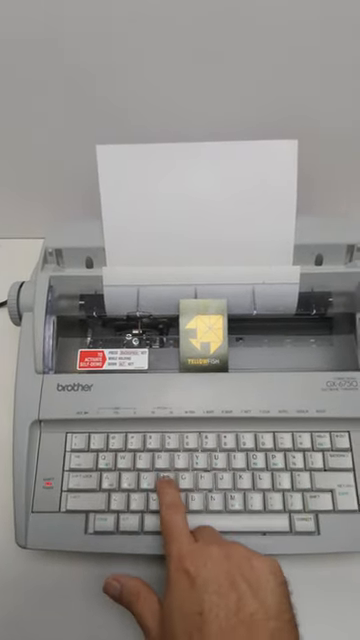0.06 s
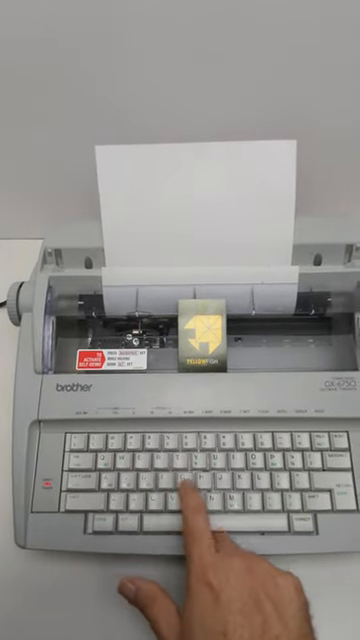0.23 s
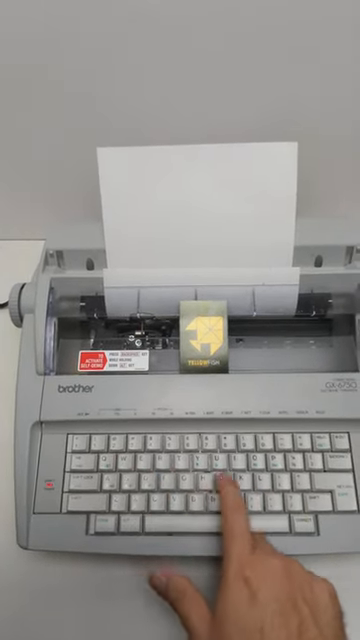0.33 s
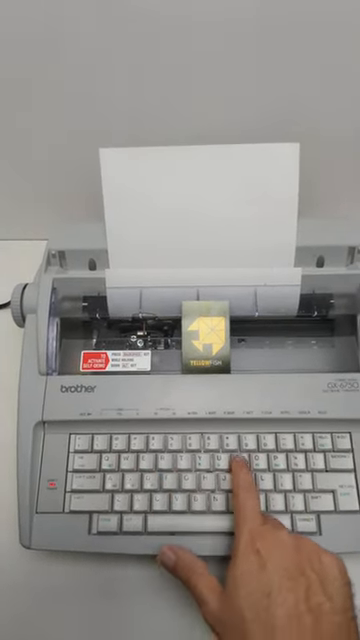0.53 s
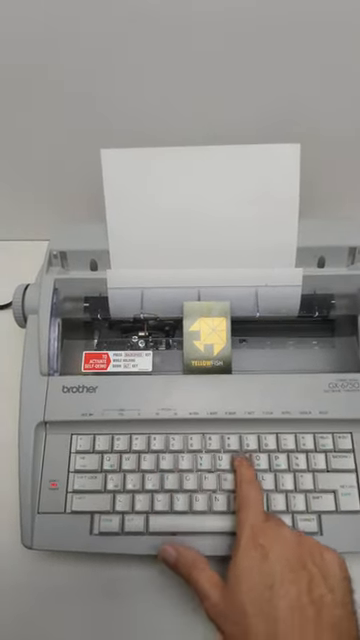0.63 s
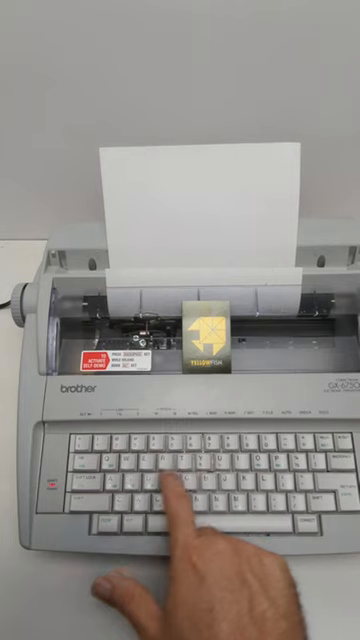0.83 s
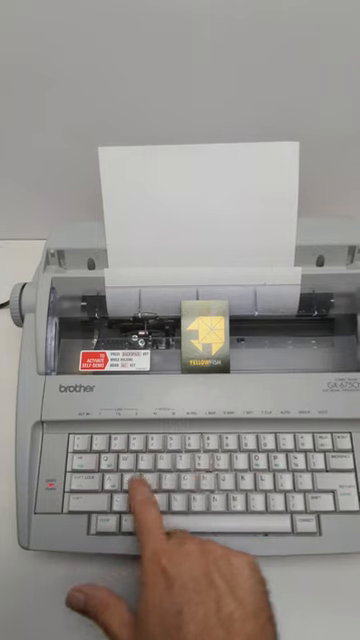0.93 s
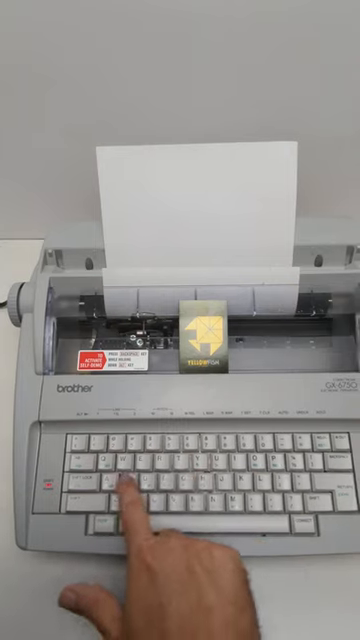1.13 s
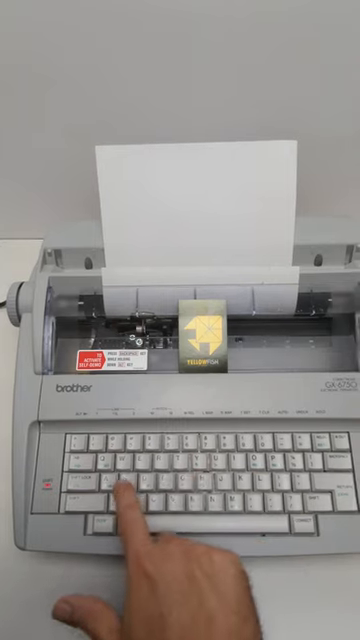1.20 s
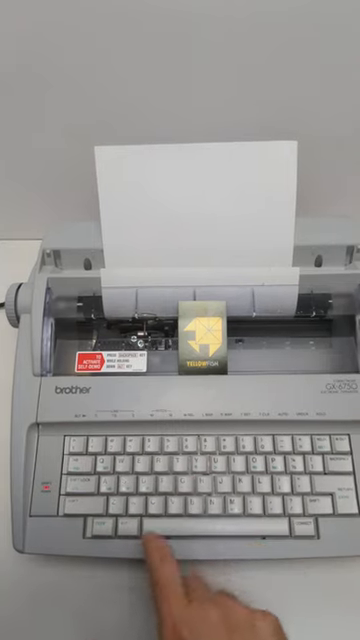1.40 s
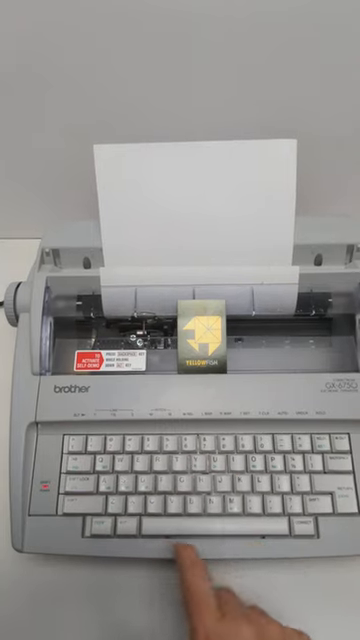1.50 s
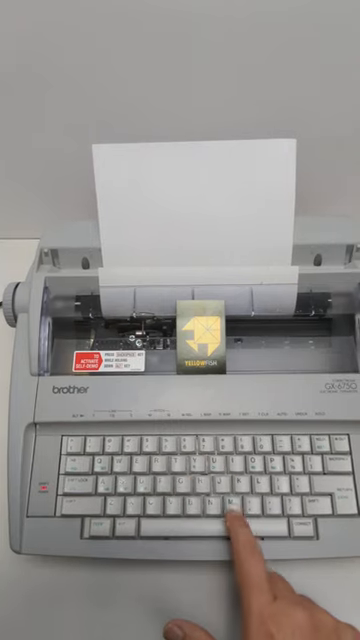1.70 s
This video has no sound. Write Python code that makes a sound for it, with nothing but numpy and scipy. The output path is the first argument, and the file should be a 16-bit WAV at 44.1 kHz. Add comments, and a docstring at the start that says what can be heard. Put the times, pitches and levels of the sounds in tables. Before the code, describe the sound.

An electronic typewriter prints three single letters: light key clicks, a brief motor whirr, a quick rattle and a hard sharp clack with a duller knock after, close to a phone in a small hard room.

```python
"""Electronic typewriter printing three letters

A machine on a desk in a small hard room, close to a phone: keys click, the print wheel whirrs round, the hammer
is launched with a rattle, strikes and knocks back, and the carriage settles with a short low note.
Contacts are random impulses through fixed spectra; the case and frame are decaying sines, the desk brief thumps.
Diffuse noise tails make the room's reverberation, over a low hum."""
import sys
import numpy as np
from scipy import signal
from scipy.fft import rfft, irfft, next_fast_len
from scipy.io import wavfile
from scipy.ndimage import uniform_filter1d

SR = 44100
rng = np.random.default_rng(int(sys.argv[2]) if len(sys.argv) > 2 else 0)


def elevation(decibels):
    """Turn decibel levels (scalar or array-like) into linear amplitude ratios."""
    levels = np.asarray(decibels, float)
    return 10 ** (levels / 20)


def wrap_up_sound(samples):
    """Save the sound to the file named by the first command line argument, as 16-bit audio."""
    columns = np.atleast_2d(samples).T
    # keep every value between -1 and 1, then stretch to whole-number steps
    tamed = np.clip(columns, -1, 1)
    steps = np.round(tamed * 32767).astype(np.int16)
    wavfile.write(sys.argv[1], SR, steps)


N = 77175

# Print cycles. Each row: launch and strike in seconds, strength in dB, level of the lowest frame tone in dB.
PRINTS = [(0.2348, 0.2689, -2.5, -42), (0.7774, 0.8114, -2.5, -40.5), (1.2388, 1.2722, -2.5, -42)]
# Key and latch clicks. Each row: start in seconds, level in dB, brightness in dB per octave,
# decay t60 in seconds, level of the case ring in dB.
CLICKS = [(0.061, -39.5, -2.5, 0.093, -77), (0.08, -29.5, 7.5, 0.064, -44.5),
          (0.191, -37.5, -1, 0.098, -41.5), (0.593, -44.5, -6.5, 0.046, -55),
          (0.605, -44, 4.5, 0.055, -46.5), (0.616, -50.5, -7, 0.06, -54.5), (0.636, -32.5, 5, 0.053, -43.5),
          (0.723, -36.5, 0, 0.084, -38), (0.729, -58.5, 2, 0.041, -47), (1.105, -47, 1, 0.068, -51.5),
          (1.112, -47, -3, 0.05, -60), (1.12, -55.5, -8.5, 0.034, -38)]
# The strike and its bounces. Each row: seconds after the strike, level in dB, decay t60 in seconds.
BLOWS = [(0., -2, 0.0048), (.0025, -6.5, 0.027), (.0105, -13.5, 0.067), (0.021, -27, 0.038)]
# The dull knock of the hammer's return. Each row: seconds after the strike, level in dB, decay t60 in seconds.
KNOCKS = [(0.063, -20, 0.082)]


def evened(x):
    """Normalises a signal to unit root-mean-square value."""
    return x / np.sqrt(np.mean(x ** 2) + 1e-20)


def read(points, hz):
    """Interpolates a spectrum on a logarithmic frequency axis, as pitch is heard."""
    f, value = np.transpose(points)
    return np.interp(np.log(hz + 1), np.log(f + 1), value)


def add(mix, s, sound):
    """Superposes a sound on the mix from time s in seconds, by linear addition."""
    part = mix[round(s * SR):][:len(sound)]
    part += sound[:len(part)]


def colour(points, tilt_db=0., size=2048):
    """Minimum-phase filter of unit energy: the Hilbert transform of the log spectrum gives its phase."""
    hz = abs(np.fft.fftfreq(size, 1 / SR))
    tilt = tilt_db * np.log2((hz + 100) / 2000)
    log = np.log(elevation(np.maximum(read(points, hz) + tilt, -100)))
    taps = np.fft.ifft(np.exp(np.conj(signal.hilbert(log)))).real[:size // 2]
    return taps / np.linalg.norm(taps)


def modes(table, size=12000, sag=0.):
    """Modal superposition: exponentially dying sines that start sharp by the share sag and settle."""
    t = np.arange(size) / SR
    settle_s = .011
    bent = t + sag * settle_s * (1 - np.exp(-t / settle_s))
    return sum(elevation(db - 60 * t / t60) * np.sin(2 * np.pi * hz * bent) for hz, db, t60 in table)


def grit(size, spread_db):
    """Dense tiny contacts: Gaussian noise of uneven, exponentially distributed size in dB."""
    unevenness = np.minimum(rng.exponential(1, size), 5)
    return evened(rng.standard_normal(size) * elevation(spread_db * unevenness))


def burst(drive, db, t60, rise_s):
    """Impact envelope: a linear rise times an exponential decay."""
    t = np.arange(len(drive)) / SR
    return drive * np.minimum(t / rise_s, 1) * elevation(db - 60 * t / t60)


def tone(hz):
    """One second of a pure tone, simple harmonic motion of unit amplitude."""
    return np.sin(2 * np.pi * hz * np.arange(SR) / SR)


def noise_pair(frames, size):
    """Partial coherence: random short-time spectra for two microphones, alike in the bass."""
    # Each row: frequency in Hz, left-right likeness from 0 to 1.
    likeness = [(200, 0.97), (450, 0.87), (900, 0)]
    hz = np.fft.rfftfreq(size, 1 / SR)
    a, b, c, d = rng.standard_normal((frames, len(hz), 4)).T
    same = read(likeness, hz)[:, None]
    left = a + 1j * b
    right = same * left + np.sqrt(1 - same ** 2) * (c + 1j * d)
    return hz, np.array([left, right])


def hum():
    """Stationary coloured noise, the low rumble of room and desk, swelling while the machine works."""
    # Each row: frequency in Hz, relative level in dB.
    spectrum = [(25, -43), (60, 2.5), (90, -2), (130, -3.5), (200, -24.5), (300, -5.5), (380, -31.5),
                (2000, -32), (14000, -60.5)]
    # Each row: time in seconds, change of level in dB.
    swell = [(.05, -5), (0.102, 2), (1.621, 0), (1.721, -2.5)]
    hz, z = noise_pair(N // 512 + 5, size=2048)
    rumble = signal.istft(z * elevation(read(spectrum, hz))[:, None], nperseg=2048, noverlap=1536)[1][:, :N]
    swell_db = np.interp(np.arange(N) / SR, *np.transpose(swell))
    return elevation(-58 + swell_db) * evened(rumble)


def whirr():
    """Source and filter: the turning print wheel motor as dense contacts of varying level."""
    # Each row: time in seconds, level in dB.
    course = [(0.056, -74), (0.076, -50.5), (0.151, -52.5), (.2, -48.5), (0.234, -46.5), (.3, -92),
              (.585, -84.5), (.61, -53.5), (.7, -50), (0.773, -46), (.84, -82), (1.101, -64),
              (1.129, -57.5), (1.2, -50.5), (1.236, -46), (1.3, -70.5)]
    # Each row: frequency in Hz, relative level in dB.
    spectrum = [(150, -15.5), (297, -1.5), (406, -2.5), (1140, -3), (1660, -4.5), (4160, -10), (7620, -28),
                (13200, -29.5), (16000, -55)]
    level_db = np.interp(np.arange(N) / SR, *np.transpose(course))
    return signal.oaconvolve(elevation(level_db) * grit(N, 1.5), colour(spectrum))[:N]


def click(db, tilt_db, t60):
    """Brief contact noise of a key or latch through a fixed spectrum, tilted by its brightness."""
    # Each row: frequency in Hz, relative level in dB.
    spectrum = [(150, -29), (457, -6.5), (1290, 5.5), (1790, 9.5), (2220, 0.5), (3900, 5.5), (4350, 6),
                (4850, -1.5), (7180, -11), (9260, -12), (16000, -40)]
    contact = burst(grit(SR // 2, 0.67), db, t60, rise_s=0.0016)
    return signal.oaconvolve(contact, colour(spectrum, tilt_db))


def case(db, tilt_db=0.):
    """Modal excitation: a soft-edged blow rings the plastic case, landing a little differently each time."""
    # Each row: frequency in Hz, level in dB before the blow's own level, tilt and scatter, decay t60 in seconds.
    case_modes = [(336.1, -12.5, 0.34), (427.1, -0.5, 0.17), (621.7, -10, 0.16), (738, -24.5, 0.3),
                  (893.7, -10.5, 0.19), (920, -16, 0.27)]
    pivot_hz = case_modes[1][0]
    struck = []
    for hz, level_db, t60 in case_modes:
        scatter_db = 2 * rng.standard_normal()
        struck.append((hz, db + level_db + scatter_db + tilt_db * np.log2(hz / pivot_hz), t60))
    ring = modes(struck, sag=.13)
    return ring * np.minimum(np.arange(len(ring)) / SR / .004, 1)


def rattle(drive):
    """Resonance under repeated impacts: loose metal chatters in uneven clumps while the hammer flies."""
    # Each row: frequency in Hz, damping in Hz (t60 is 0.24 over it), level in dB before differentiation.
    peaks = [(4550, 250, 0)]
    # Each row: frequency in Hz, relative level in dB.
    spectrum = [(150, -33.5), (414, -1), (790, -7.5), (2220, 3), (2500, -7), (4490, 2.5), (7470, -9),
                (11900, -4), (16000, -34)]
    full_s, fade_s, level_db, sag_db = .03, .003, -26, -12.5
    t = np.arange(len(drive)) / SR
    gate = np.clip(t / 0.00052, 0, 1) * np.clip((full_s - t) / fade_s + 1, 0, 1)
    gate *= elevation(level_db + sag_db * t / full_s)
    clumps = evened(uniform_filter1d(rng.standard_normal(len(t)), round(.0012 * SR)))
    gate *= elevation(4 * clumps)  # 4 dB rms of unevenness
    metal = np.gradient(modes([(hz, db, 0.24 / damping) for hz, damping, db in peaks], size=1024))
    return signal.oaconvolve(gate * drive, colour(spectrum) + metal / np.linalg.norm(metal))


def strike_blows(drive):
    """Impact excitation of resonators: the strike and its bounces ring hammer and wheel."""
    # Each row: frequency in Hz, relative level in dB.
    spectrum = [(150, -11.5), (400, -8), (800, -8), (1300, -2), (1700, 0.5), (2500, -3.5), (4000, 2.5),
                (6000, -8), (9300, -14.5), (16000, -31.5)]
    # Each row: frequency in Hz, relative level in dB before differentiation, decay t60 in seconds.
    hammer_modes = [(2450, -5, .012), (2780, -2, .014), (4200, 0, .012), (4800, -1, .012)]
    blows = np.zeros(drive.shape[1])
    for row, (s, db, t60) in zip(drive[1:], BLOWS):
        add(blows, s, burst(row, db, t60, rise_s=0.00017))
    hammer = np.gradient(modes(hammer_modes, size=1024))
    return signal.oaconvolve(blows, colour(spectrum) + .5 * hammer / np.linalg.norm(hammer))


def jingle(drive):
    """High-passed contact noise with exponential decay: a bright jingle just after the strike."""
    # Each row: frequency in Hz, relative level in dB.
    spectrum = [(6000, -34), (8500, 13), (10200, 14.5), (13000, 0.5), (16000, -15)]
    contact = np.zeros(len(drive))
    add(contact, .01, burst(drive, db=-17, t60=0.061, rise_s=0.0026))
    return signal.oaconvolve(contact, colour(spectrum))


def return_knocks(drive):
    """Soft impact: the slow rise and low spectrum make the hammer's return dull."""
    # Each row: frequency in Hz, relative level in dB.
    spectrum = [(150, -9.5), (400, -5), (900, -2), (1600, -10.5), (2600, -8.5), (8000, -47.5)]
    knocks = np.zeros(drive.shape[1])
    for row, (s, db, t60) in zip(drive[::-1], KNOCKS):
        add(knocks, s, burst(row, db, t60, rise_s=0.007))
    return signal.oaconvolve(knocks, colour(spectrum))


def desk_thumps(out, strike):
    """Low resonance of a heavy body: the desk answers with short deep tones."""
    # Each row: seconds after the strike, level in dB, frequency in Hz.
    thumps = [(.014, -31, 70.2), (0.062, -29.5, 55.8), (0.104, -38.5, 58)]
    for s, db, hz in thumps:
        add(out, strike + s, burst(tone(hz), db, t60=0.13, rise_s=0.016))


def frame_ring(ring_db):
    """Weakly damped harmonics with amplitude modulation: a part of the frame sings on, wavering."""
    # Upper tones. Each row: multiple of the lowest tone's frequency, level in dB.
    upper = [(3, -61.), (4, -51.)]
    t, out = np.arange(SR) / SR, np.zeros(SR)
    for times, db in [(1, ring_db)] + upper:
        waver_hz = rng.uniform(16.59, 69.3)
        waver = 1 + .4 / times * np.sin(2 * np.pi * (waver_hz * t + rng.random()))
        out += burst(waver * tone(round(times) * 414.5), db, t60=1.3, rise_s=0.014)
    return out


def carriage_step():
    """Damped oscillation: the carriage settles with a short low note."""
    return burst(tone(286), db=-53.5, t60=0.6, rise_s=0.02)


def motor_whine(out):
    """Frequency sweep by phase integration: a faint whine as the wheel motor speeds up."""
    # In order: start and end in seconds, first and last frequency in Hz, level in dB.
    start, end, from_hz, to_hz, db = (1.14, 1.235, 950, 1450, -57)
    hz = np.linspace(from_hz, to_hz, round((end - start) * SR))
    swell = np.hanning(len(hz)) ** .5
    add(out, start, elevation(db) * swell * np.sin(2 * np.pi * np.cumsum(hz) / SR))


def contacts():
    """Superposed impact noise: wheel motor, key clicks, rattles and strikes that partly repeat."""
    share = 0.76  # amplitude weight of the contacts common to all cycles
    rows = (1 + len(BLOWS) + len(KNOCKS), SR // 2)
    out = whirr()
    for s, db, tilt_db, t60, _ in CLICKS:
        add(out, s, click(db, tilt_db, t60))
    same = grit(rows, 2.3)
    for launch, strike, db, _ in PRINTS:
        drive = elevation(db) * (share * same + np.sqrt(1 - share ** 2) * grit(rows, 3.3))
        add(out, launch, rattle(drive[0]))
        add(out, strike, strike_blows(drive) + return_knocks(drive) + jingle(drive[0]))
    return out


def rings():
    """Free vibration of case, desk, carriage and motor, with the frame's long ring kept apart."""
    # Launch, strike and return. Each row: seconds after the strike, level in dB, brightness in dB per octave.
    case_hits = [(-.034, -42.5, -11), (0., -18, 4), (.066, -34, 9.5)]
    body, frame = np.zeros((2, N))
    for s, *_, case_db in CLICKS:
        add(body, s, case(case_db, tilt_db=-4.5))
    for _, strike, db, ring_db in PRINTS:
        for s, case_db, tilt_db in case_hits:
            add(body, strike + s, case(db + case_db, tilt_db))
        desk_thumps(body, strike)
        add(body, strike + 0.093, carriage_step())
        add(frame, strike + .006, frame_ring(ring_db))
    motor_whine(body)
    return body, frame


def tail(t60_of, gap_s):
    """Diffuse-field decay: two-channel noise, left energy 1, each band dying at its own speed."""
    hz, z = noise_pair(SR // 64, size=256)
    t = np.arange(z.shape[2]) * 64 / SR
    taps = signal.istft(z * elevation(-60 * t / t60_of(hz)[:, None]), nperseg=256, noverlap=192)[1]
    taps *= np.clip(np.arange(taps.shape[1]) / SR / gap_s, 0, 1)  # fades in over the gap
    return taps / np.linalg.norm(taps[0])


def room(pair):
    """Convolution with an impulse response: quick scatter from near surfaces, then reverberation."""
    # Each row: frequency in Hz, reverberation t60 in seconds.
    reverberation = [(200, 0.62), (530, 0.56), (1400, 0.46), (3700, 0.42), (12000, 0.32)]
    near = elevation(-10) * tail(lambda hz: 0.02 + 0 * hz, gap_s=0.00036)
    far = elevation(-7.5) * tail(lambda hz: read(reverberation, hz), gap_s=0.00087)
    return signal.fftconvolve(pair, near + far, axes=1)[:, :N]


def scene():
    """Two-point reception: the ports face other parts of the machine, with unlike phase and treble."""
    # Each row: frequency in Hz, likeness of the two ports from 0 to 1.
    port_likeness = [(350, 0.95), (700, 0.22), (3000, 0.29), (14000, 0.31)]
    # Each row: frequency in Hz, phase in radians by which the left leads.
    phase_lead = [(0, 0), (520, -.1), (1980, 3.8), (2500, .8), (3880, 4.3), (5250, -1.9), (6200, .3),
                  (7240, -2.1), (9910, -6.), (11600, -12.4), (16500, -14.6)]
    # Each row: frequency in Hz, left minus right level in dB.
    level_difference = [(60, -1), (200, 2), (380, -2), (700, -5), (1290, 3.5), (2380, 0), (4400, 3),
                        (8120, -2.5), (15000, 26)]
    size = next_fast_len(N + 4096)
    hz = np.fft.rfftfreq(size, 1 / SR)
    same = read(port_likeness, hz)
    front, back = rfft(contacts(), size), rfft(contacts(), size)
    pair = np.array([front, same * front + np.sqrt(1 - same ** 2) * back])
    body, frame = rings()
    lead = np.interp(hz, *np.transpose(phase_lead))
    direct = (pair + rfft(body, size)) * np.array([np.exp(.5j * lead), np.exp(-.5j * lead)])
    reverberant = rfft(room(irfft(pair, size)[:, :N]), size)
    lean = elevation(read(level_difference, hz) / 2)
    ports = (direct + reverberant) * np.array([lean, 1 / lean])
    return irfft(ports, size)[:, :N] + frame + hum()


def band_limit(x):
    """A steep low-pass at the top of the band."""
    return signal.sosfilt(signal.butter(12, 16970, fs=SR, output="sos"), x)


def record(dry):
    """Band limiting and saturation: the phone's bass cut, a soft overload on the peaks, a treble limit."""
    ceiling = 1.3
    cut = signal.sosfilt(signal.butter(3, 52, "high", fs=SR, output="sos"), dry)
    soft = ceiling * np.tanh(cut / ceiling)
    limited = signal.sosfilt(signal.butter(16, 16000, fs=SR, output="sos"), soft)
    return band_limit(limited)


dry = scene()
out = record(dry)
wrap_up_sound(out)
```